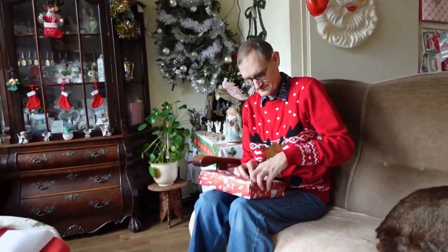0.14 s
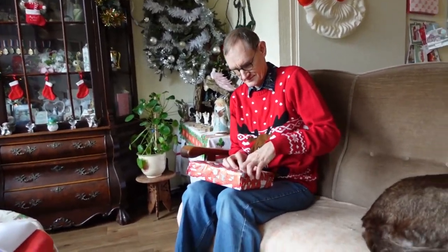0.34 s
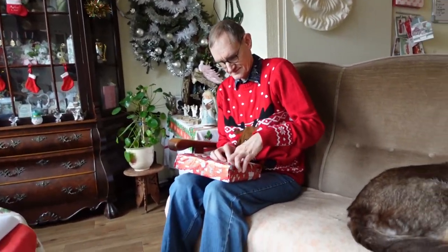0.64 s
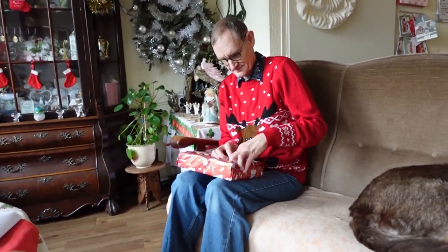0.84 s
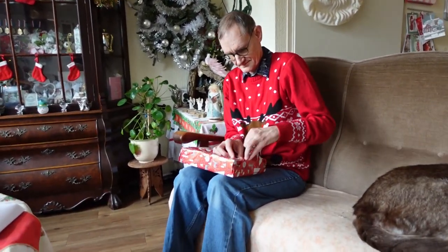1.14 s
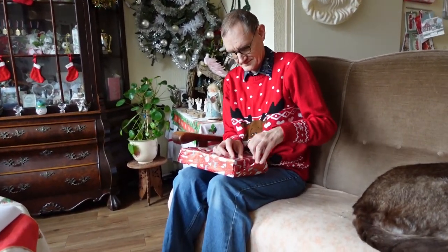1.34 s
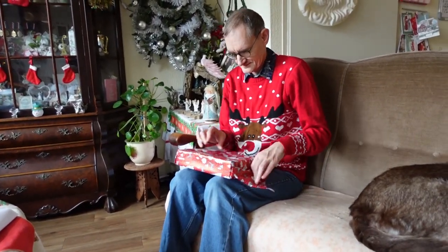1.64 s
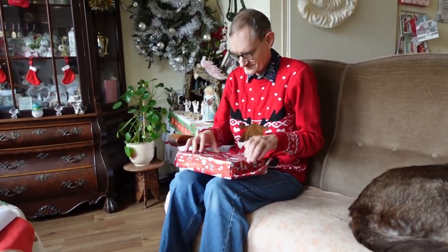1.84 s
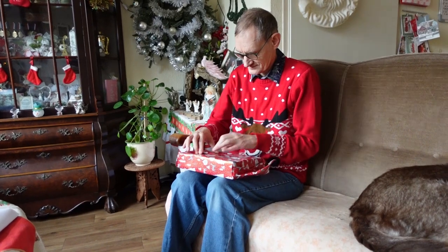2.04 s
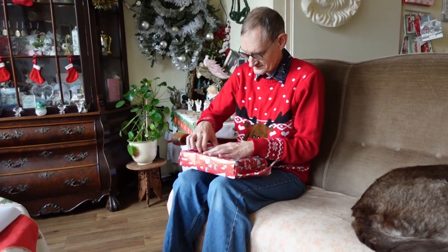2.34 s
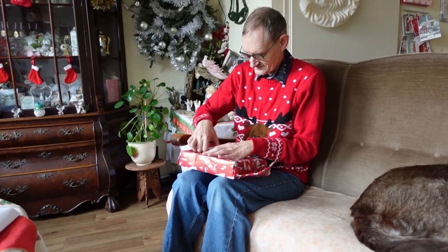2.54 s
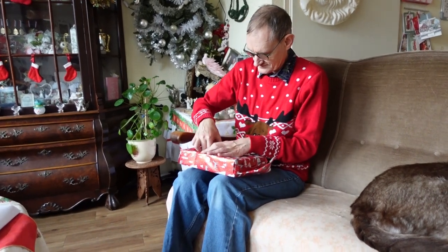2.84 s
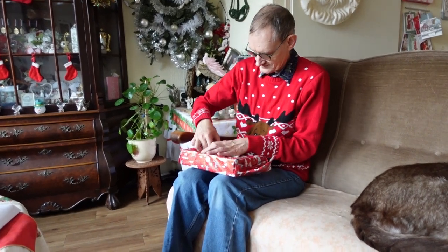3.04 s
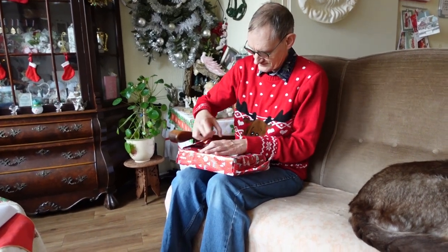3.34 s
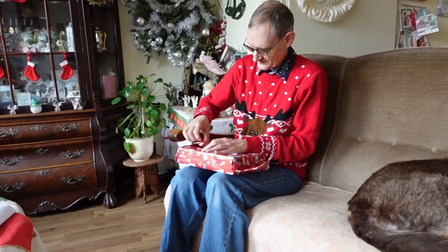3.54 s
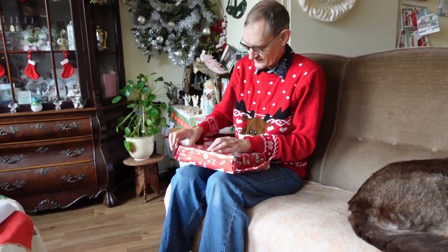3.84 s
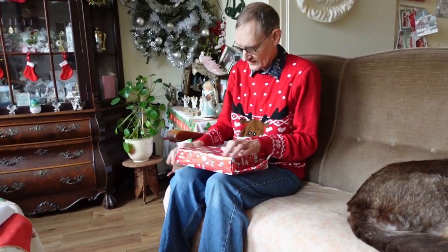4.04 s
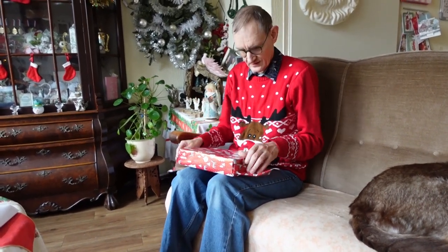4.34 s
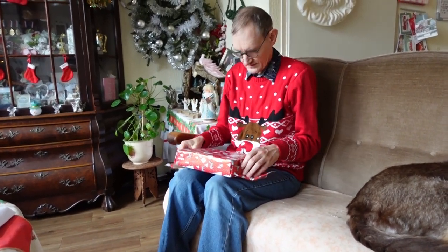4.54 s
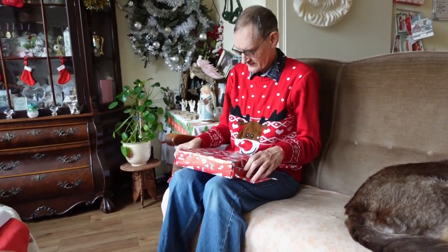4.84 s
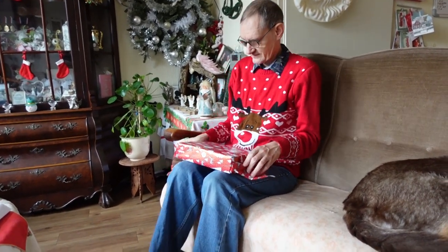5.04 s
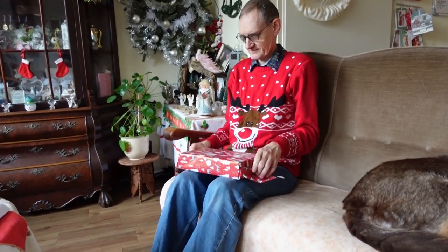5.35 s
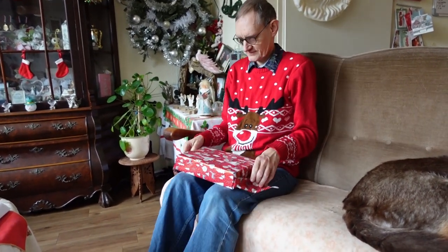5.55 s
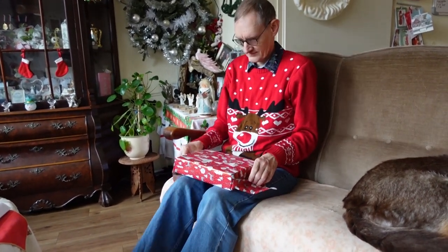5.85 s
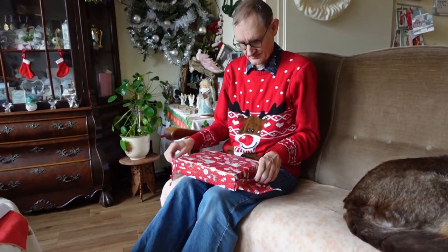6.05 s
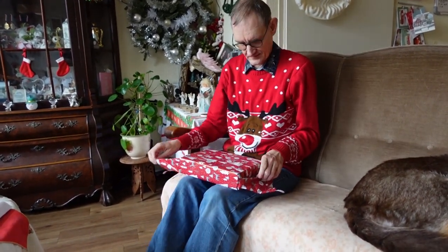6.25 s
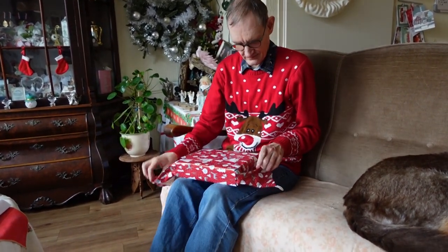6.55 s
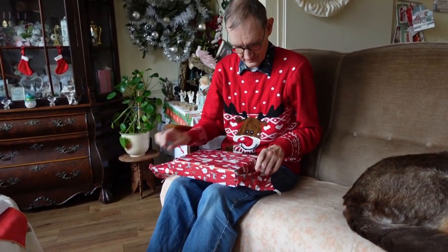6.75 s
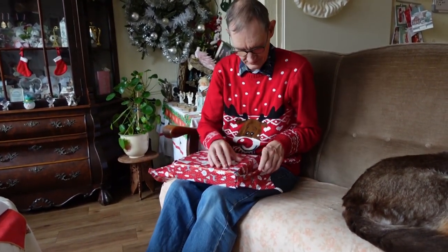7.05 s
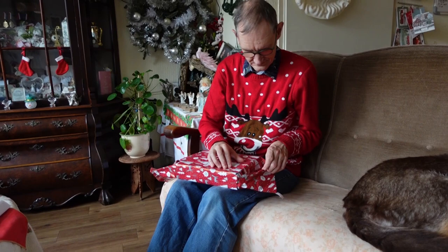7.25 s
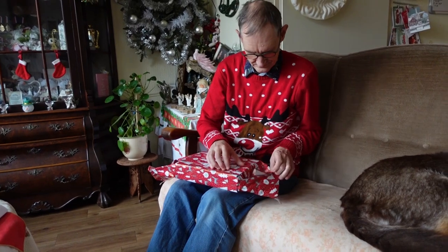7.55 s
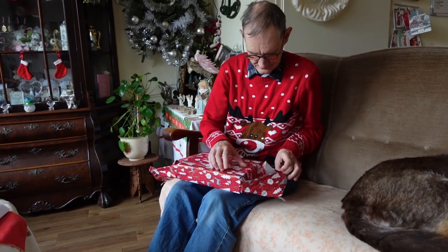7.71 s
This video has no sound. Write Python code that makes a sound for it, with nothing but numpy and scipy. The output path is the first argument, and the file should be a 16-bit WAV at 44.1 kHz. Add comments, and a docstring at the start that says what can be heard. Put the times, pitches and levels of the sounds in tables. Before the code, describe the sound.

Hands work at the paper on a boxed present in a quiet living room. Sharp creases snap over fine rustling crackle, the strongest near three seconds with a dull box knock. A sparse lull follows, then harder crinkling with hollow lid taps, a brief easing, and a dense crackling finish. Stereo microphones a few metres away catch short room reflections, little bass and faint hiss.

```python
"""Hands unwrap a boxed present in a quiet living room; two microphones a few metres off hear little bass.
From the start, snapping creases (shaped noise bursts) stand out of rustling crackle (clumped tiny bursts).
The strongest snap comes near 3 s, among dull box thumps and lid taps (decaying sines), then a lull.
From 5 s the work gets harder, with more thumps and taps; after a brief ease near 7 s it ends in dense snaps.
Echoes and a short random-sign tail answer throughout, over steady coloured noise for air and hiss."""
import sys
import numpy as np
from scipy import signal
from scipy.fft import rfft, irfft, next_fast_len
from scipy.io import wavfile
from scipy.ndimage import uniform_filter1d, minimum_filter1d

SR = 44100
rng = np.random.default_rng(int(sys.argv[2]) if len(sys.argv) > 2 else 0)


def output_pcm(signal):
    """Save a mono or channel-first signal as 16-bit PCM at the path in sys.argv[1].

    Samples are clipped to [-1, 1] before scaling.
    """
    pcm = np.clip(np.atleast_2d(signal).T, -1, 1) * 32767
    wavfile.write(sys.argv[1], SR, np.round(pcm).astype(np.int16))


N = 347508


def amp(db):
    """Converts dB to an amplitude factor."""
    return 10 ** (np.asarray(db) / 20)


def evened(x):
    """Scales to unit rms."""
    return x / np.sqrt(np.mean(x ** 2) + 1e-20)


def read(points, hz):
    """Interpolates a table over log frequency."""
    f, value = np.transpose(points)
    return np.interp(np.log(hz + 1), np.log(f + 1), value)


def coloured(x, points):
    """Filters a long sound by a spectrum in dB."""
    size = next_fast_len(x.shape[-1])
    gain = amp(read(points, np.fft.rfftfreq(size, 1 / SR)))
    return irfft(rfft(x, size) * gain, size)[..., :x.shape[-1]]


# background spectrum: f/Hz, relative level/dB
HUSH_SPECTRUM = [(18, -69), (30, -45), (138, -21), (486, -13), (822, -3), (1460, -6), (1910, 3),
                 (2170, -1.5), (3870, -8.5), (7470, -11), (14000, -21), (16000, -23)]
# mid rms: level/dB
HUSH_LEVEL_DB = -53
# spectrum of the part that differs between the microphones (also in room): f/Hz, gain/dB
SIDE_SPECTRUM = [(60, -2), (150, -4), (380, -2.5), (950, -0.5), (2000, -6.5), (4000, -3.5), (8000, -1),
                 (11000, -5.5), (15000, -44)]


def hush():
    """Still air and microphone hiss: coloured noise, shared part plus sideways part."""
    mid, side = coloured(rng.standard_normal((2, N)), HUSH_SPECTRUM)
    side = coloured(side, SIDE_SPECTRUM)
    return amp(HUSH_LEVEL_DB) * np.array([mid + side, mid - side]) / mid.std()


# reverberation time: f/Hz, t60/s
ROOM_T60 = [(300, 0.55), (800, 0.4), (2000, 0.33), (5500, 0.29), (14000, 0.26)]


def tail():
    """Sparse random-sign taps build up over the first walls; each band decays at its own speed."""
    spacing, build_up_s = 16, 0.0024  # spacing in samples
    taps = np.zeros(SR)
    slots = np.arange(0, SR - spacing, spacing)
    taps[slots + rng.integers(0, spacing, len(slots))] = rng.choice([-1., 1.], len(slots))
    hz, t, bands = signal.stft(taps, SR, nperseg=256)
    bands = bands * amp(-60 * t / read(ROOM_T60, hz)[:, None])
    decayed = signal.istft(bands, SR, nperseg=256)[1][:SR]
    decayed = decayed * (1 - np.exp(-(np.arange(SR) / SR / build_up_s) ** 2))
    return decayed / np.linalg.norm(decayed)


# early echoes off floor, sofa wall and furniture: t/ms, level/dB
EARLY_ECHOES = [(7.2, -16), (13, -17.5), (18, -32), (22, -25.5)]
TAIL_DB, TAIL_SIDE_DB = 0.5, -9.0  # side relative to the tail, before its spectrum


def late_field(thrown):
    """Moving hands excite the room differently with time: three rotating shares, a fresh tail for each."""
    turn = np.pi * np.arange(N) / SR / .37
    late = np.zeros(N)
    for k in range(3):
        share = thrown * np.sqrt(2 / 3) * np.cos(turn + k * np.pi / 3)
        late += signal.fftconvolve(share, tail())[:N]
    return late


def room(direct, walls, thrown):
    """Adds echoes and tail, shared by both microphones but for a weak sideways part."""
    early = np.zeros(SR // 20)
    for ms, db in EARLY_ECHOES:
        early[round(ms * SR / 1000)] = amp(db)
    late = amp(TAIL_DB) * late_field(thrown)
    mid = direct + signal.oaconvolve(walls, early)[:N] + late
    side = amp(TAIL_DB + TAIL_SIDE_DB) * coloured(late_field(thrown), SIDE_SPECTRUM)
    return np.array([mid + side, mid - side])


def struck(events, modes, soft_s):
    """Blows on cardboard, each ringing the same decaying sines after a soft onset."""
    t = np.arange(SR // 4) / SR
    ring = sum(amp(db - 60 * t / t60) * np.sin(2 * np.pi * hz * t) for hz, db, t60 in modes)
    ring = ring * (1 - np.exp(-(t / soft_s) ** 2))
    blows = np.zeros(N)
    for s, db in events:
        blows[round(s * SR)] = amp(db)
    return signal.oaconvolve(blows, ring / abs(ring).max())[:N]


# box knocks against lap and hands: t/s, peak level/dB
BOX_KNOCKS = [(.814, -51), (3.153, -41), (5.317, -55), (5.618, -46), (5.748, -54), (6.388, -43.5)]
# box modes: f/Hz, relative level/dB, t60/s
BOX_MODES = [(163, -14.5, 0.14), (225, -4, 0.08), (272, -8, 0.16), (335, 9.5, 0.04), (459, 3.5, 0.045)]


def thumps():
    """Soft blows ring the low modes of the box."""
    return struck(BOX_KNOCKS, BOX_MODES, soft_s=0.0055)


# fingertips on the lid through the paper: t/s, peak level before the high-pass/dB
LID_TAPS = [(3.016, -32), (3.399, -41), (4.875, -30.5), (4.938, -37), (5.056, -33), (5.146, -29),
            (5.205, -31), (6.233, -24.5), (6.512, -24), (7.663, -30), (7.834, -21.5)]
# lid modes: f/Hz, relative level/dB, t60/s
LID_MODES = [(748, -1, 0.095), (849, 7, 0.027), (977, -18, 0.012), (1810, -4.5, 0.035)]


def lid_taps():
    """Quicker blows ring the hollow lid modes, with the lows cut."""
    high_pass = signal.butter(2, 450, "high", fs=SR, output="sos")
    return signal.sosfilt(high_pass, struck(LID_TAPS, LID_MODES, soft_s=0.0004))


# paper spectrum (also in crackle): f/Hz, relative level/dB
PAPER_SPECTRUM = [(24, -64), (40, -40), (121, -45), (363, -22), (479, -17), (873, -6.5), (1090, -6.5),
                  (1950, 0.5), (2150, -1), (3220, -0.5), (6330, -3), (13400, -15.5), (16000, -25.5)]
LEAD_MS, CREAK_MS, CREAK_DB = 4, 1.1, -9.0  # creak before the crease gives way; its growth; its top


def buckle(ring_hz, treble_db, body_db, burst_ms, ring_db, sharp):
    """One noise burst a crease, coloured by paper and ringing patch.
    Also one clean pulse of equal energy: the colour averaged over all directions."""
    size = 1024
    hz = np.fft.rfftfreq(size, 1 / SR)
    ms = 1000 * np.arange(size) / SR - LEAD_MS
    creak = amp(CREAK_DB) * np.exp(ms / CREAK_MS)
    shape = np.where(ms < 0, creak, np.exp(-(ms / burst_ms) ** 2))
    slips = rng.standard_normal((len(ring_hz), size)) * shape

    patch_db = ring_db / (1 + (sharp * np.log((hz + 1) / ring_hz[:, None])) ** 2)
    treble_shelf_db = treble_db[:, None] / (1 + (6000 / (hz + 1)) ** 4)
    body_shelf_db = body_db[:, None] / (1 + (hz / 1200) ** 4)
    colour_db = read(PAPER_SPECTRUM, hz) + patch_db + treble_shelf_db + body_shelf_db

    # minimum phase: the colour adds no sound before the slip
    log_gain = np.log(amp(colour_db))
    circle = np.concatenate([log_gain, log_gain[:, -2:0:-1]], axis=1)
    causal = np.exp(np.conj(signal.hilbert(circle))[:, :len(hz)])
    burst = irfft(rfft(slips) * causal, size)
    burst = burst / abs(burst).max(axis=1, keepdims=True)
    pulse = np.roll(irfft(causal, size), round(LEAD_MS * SR / 1000), axis=1)
    return burst, pulse * (burst.std(axis=1) / pulse.std(axis=1))[:, None]


# how hard the hands work the sheet: t/s, crackle level/dB
HAND_EFFORT = [(0, -44), (.25, -46), (.6, -41), (1, -44), (1.3, -44.5), (1.45, -48.5), (1.7, -51.5),
               (2.15, -59), (2.3, -45.5), (3, -61), (3.35, -104), (3.88, -50), (3.95, -44), (4.06, -45.5),
               (4.27, -45), (4.33, -55.5), (4.7, -51), (4.85, -37.5), (5.03, -49), (5.2, -34.5),
               (5.5, -40.5), (5.78, -32), (5.85, -40.5), (6.15, -30), (6.3, -33), (6.39, -21.5),
               (6.55, -30.5), (6.82, -45), (6.9, -50), (7.03, -48), (7.16, -37.5), (7.42, -43),
               (7.47, -30.5), (7.68, -30.5), (7.88, -20)]
# each snap starts a shower of small creases, its level following that of the snap
SHOWER_DB, SHOWER_DB_PER_DB, SHOWER_RISE_S, SHOWER_T60_S = -26, 0.87, 0.002, 0.38
SHOWER_TREBLE_DB, SHOWER_TREBLE_INHERITED, SHOWER_BODY_DB = 0.5, 0.78, -2.5
RUB_TREBLE_DB = -2.5  # loose rubbing is dull


def effort():
    """Power of rubbing and of decaying showers, and the power-weighted shower treble."""
    s, db, _, treble_db, thrown_db = np.transpose(CREASE_SNAPS)
    t = np.arange(N) / SR
    power = amp(SHOWER_DB + SHOWER_DB_PER_DB * (db + thrown_db)) ** 2
    shower_treble_db = SHOWER_TREBLE_DB + SHOWER_TREBLE_INHERITED * treble_db
    starts = np.zeros((2, N))
    starts[:, np.round(s * SR).astype(int)] = power, power * shower_treble_db
    rise = 1 - np.exp(-t[:SR] / SHOWER_RISE_S)
    shower = (rise * amp(-60 * t[:SR] / SHOWER_T60_S)) ** 2
    showered, weighted_treble = signal.oaconvolve(starts, [shower], axes=1)[:, :N]
    rubbed = amp(np.interp(t, *np.transpose(HAND_EFFORT))) ** 2
    return rubbed, abs(showered), weighted_treble


CRACKLE_THROWN_DB = -2.5  # share that reaches the walls


def crackle(per_s=900, slide_db=-9, body_db=3):
    """Small creases in clumps over sliding hiss, as straight, near-wall and room sound."""
    rubbed, showered, weighted_treble = effort()
    power = rubbed + showered
    treble_db = (RUB_TREBLE_DB * rubbed + weighted_treble) / power
    low_db = SHOWER_BODY_DB * showered / power

    count = 24  # different paper patches
    flat, ring_hz = np.zeros(count), np.geomspace(900, 7500, count)
    grains = np.array(buckle(ring_hz, flat, flat + body_db, burst_ms=0.63, ring_db=10, sharp=4.3))
    drift = uniform_filter1d(uniform_filter1d(rng.standard_normal(N), 300), 300)
    clumps_db = 3.5 * evened(drift)
    size_db = 4.5 * np.minimum(rng.exponential(1, N), 3.2)
    hits = (rng.random(N) < per_s / SR) * amp(size_db + clumps_db)
    patch = rng.integers(0, count, N)
    small = np.zeros((2, N))  # bursts, pulses
    for k in range(count):
        small += signal.oaconvolve([hits * (patch == k)], grains[:, k], axes=1)[:, :N]
    slide = evened(coloured(rng.standard_normal(N), PAPER_SPECTRUM))
    sheet = evened(small) + amp(slide_db) * slide

    low = signal.sosfiltfilt(signal.butter(2, 1200, fs=SR, output="sos"), sheet)
    top = signal.sosfiltfilt(signal.butter(2, 6000, "high", fs=SR, output="sos"), sheet)
    sheet = sheet + (amp(treble_db) - 1) * top + (amp(low_db) - 1) * low
    direct, thrown = np.sqrt(power) * sheet
    return np.array([direct, amp(CRACKLE_THROWN_DB) * direct, amp(CRACKLE_THROWN_DB) * thrown])


# buckling creases, plus at 1.1382 s a quick echo of the snap just before (also in effort): t/s, burst peak
# level/dB, patch ring f/Hz, treble level/dB, share thrown into the room/dB
CREASE_SNAPS = [(0.1101, -16.5, 1880, 3, 1), (.1796, -20.5, 1920, 5, 2), (0.2695, -22.5, 1850, 4, 5),
                (0.2933, -13.5, 4540, -5.5, 5), (0.3189, -13, 7700, 1.5, 5), (0.45, -22, 3020, 7, 11.5),
                (.46, -11, 7700, 7, -0.5), (0.546, -22, 1940, 16.5, 5), (0.5923, -24, 3830, 4, 0),
                (0.6237, -18, 7750, -2, -2), (0.6624, -8, 1200, 3.5, 1), (.7234, -12, 5200, 3, 2),
                (0.8161, -0.5, 2060, -1, -3), (0.8237, 2, 3940, 8, -2.5), (1.0408, -16.5, 3020, 7, -5),
                (1.11, -16, 3660, 10, -6.5), (1.1318, -0.5, 3950, 4, 5.5), (1.1382, -1, 5600, 2, -20),
                (1.2817, -20.5, 1770, -17, -3), (1.3671, -19, 2900, -42, -1.5),
                (1.3888, -32.5, 4180, 14, -27.5), (1.5421, -17.5, 3500, -2.5, -0.5),
                (1.5762, -16.5, 5500, -3, 0), (1.6143, -14, 2570, -6.5, -7), (1.6349, -15.5, 3030, -6, 0.5),
                (1.6761, -10.5, 3970, 5, -4.5), (1.8128, -25, 5900, 3, -5), (1.878, -27.5, 3420, -6, 4.5),
                (1.8977, -17.5, 6540, -3, -7), (2.017, -36, 2000, 7, 5.5), (2.2384, -16.5, 7300, -9, -4),
                (2.289, -21, 3420, 8, -3), (2.5021, -14.5, 5300, 0, -5), (2.5314, -16, 4660, 9, 5.5),
                (2.656, -20.5, 2860, 0.5, 4), (2.7655, -17, 3900, 3.5, 4.5), (2.8044, -16, 5850, 9, -2),
                (2.8573, -18, 4370, 1, 2), (2.8944, -19.5, 3370, -11, -1), (2.922, -18, 4910, 24, -3),
                (2.932, -13.5, 1930, -4, -5), (3.013, -16, 2250, -53, -3), (3.0496, -18.5, 3010, -6, 3),
                (3.0652, 8, 3420, 3.5, -2), (3.072, -10, 11200, 20, -3), (3.126, -5.5, 7060, 28, -5.5),
                (3.1565, -0.5, 1980, 0, -0.5), (3.4003, -21.5, 1690, -78, -5), (3.453, -20, 2910, -22, -2),
                (3.5503, -33, 2950, -27, -5), (3.6142, -33.5, 1820, -6, 5.5), (3.6304, -28, 2280, 4, -4.5),
                (3.7367, -25.5, 4520, 4, -2.5), (4.015, -23, 3220, 5, 3.5), (4.058, -21.5, 4100, 2, 8.5),
                (4.168, -17.5, 3450, 2, -0.5), (4.21, -27.5, 7550, 20, 5), (4.4276, -27.5, 6160, -0.5, 6),
                (4.4997, -25, 5600, 3, -5), (4.5263, -16.5, 2930, 3, -4.5), (4.6129, -22, 2300, -6, -8),
                (4.7726, -22.5, 3330, -5, 2.5), (4.8366, -22.5, 3190, -4, -18), (4.873, -16, 2980, 10, 1),
                (4.94, -22, 1660, 4, 3.5), (4.9776, -22, 3790, -4, -4), (5.056, -24, 4500, 2, 2),
                (5.0661, -13.5, 3930, 7, -4.5), (5.1531, -20, 1820, 5, 7.5), (5.1665, -9, 4100, -7, 0.5),
                (5.287, -29, 6370, 1, 13), (5.3993, -11, 4830, 0, -1.5), (5.418, -19.5, 2800, 2, 6.5),
                (5.553, -22.5, 2950, 7, 8.5), (5.6278, -15, 4100, -2, -7), (5.6629, -7, 2700, -1, -5),
                (5.7001, -16, 3300, 9, -9), (5.8406, -15, 7100, 6, 2.5), (5.864, -17, 3500, -14, -3),
                (5.8993, -17.5, 3250, 6, 3.5), (5.9686, -8, 4100, -3, -3), (5.986, -16.5, 4780, 6, -1),
                (6.0484, -9, 1430, -1, -1.5), (6.1315, -17, 4000, 11, 11), (6.1483, -5, 6030, 5, 2),
                (6.1661, -3, 1930, 2, -24), (6.228, -10, 3980, 9, 4), (6.3524, -11, 3120, 4.5, 8),
                (6.421, -15, 1610, 4, -1), (6.4645, -7, 1730, 2, 5.5), (6.5134, -7, 1930, 1, -12),
                (6.573, -8, 5840, 9, -5.5), (6.6163, -15, 6850, 19, -10), (6.654, -15.5, 3400, -11, -12),
                (6.7434, -21, 2150, 3, 1.5), (6.8687, -21.5, 3900, 4, 1.5), (6.883, -21, 5900, -8, -3.5),
                (6.903, -19.5, 3110, -12, 2), (7.056, -36, 2470, -8, 13.5), (7.0844, -31.5, 3100, -21, 12),
                (7.232, -20, 2370, -25, 1), (7.254, -13, 4520, -6, 0.5), (7.2616, -9, 2060, -10, -4),
                (7.277, -11.5, 4000, 3, -4), (7.295, -11.5, 3020, -2, -6), (7.3637, -12.5, 3070, -7, -6),
                (7.443, -14.5, 4450, -2, 8.5), (7.4495, -4.5, 3060, -6, -4.5),
                (7.5058, -8.5, 1690, -5, -0.5), (7.5226, -12.5, 8000, 2, -0.5),
                (7.5607, -5.5, 4300, 14.5, -2.5), (7.595, -8.5, 4420, 2, 0), (7.6317, -8, 4880, 10, 1.5),
                (7.641, 6, 3080, -2, -15.5), (7.7096, -2.5, 2580, -5, 1), (7.7372, -3, 3030, -10, -20),
                (7.7979, -6.5, 1670, -21, -12), (7.8136, -3.5, 6670, 8, 0.5), (7.8357, -1.5, 3150, -24, -2),
                (7.848, -3, 2920, 6.5, -10), (7.867, -6.5, 3600, -4, 5)]
BODY_AT_3KHZ_DB, BODY_DB_PER_OCTAVE = -5, -4  # large, low patches have more body


def snaps():
    """Creases that stand out, as straight, near-wall and room sound."""
    s, db, ring_hz, treble_db, thrown_db = np.transpose(CREASE_SNAPS)
    body_db = BODY_AT_3KHZ_DB + BODY_DB_PER_OCTAVE * np.log2(ring_hz / 3000)
    burst_ms = 1.375 * amp(0.18 * thrown_db)[:, None]  # long creases tear longer and fill the room more
    burst, pulse = buckle(ring_hz, treble_db, body_db, burst_ms, ring_db=8, sharp=5.1)
    start = np.round((s - LEAD_MS / 1000) * SR).astype(int)
    at = start[:, None] + np.arange(burst.shape[1])
    out = np.zeros((3, N + burst.shape[1]))
    np.add.at(out[0], at, amp(db)[:, None] * burst)
    np.add.at(out[1], at, amp(db + .5 * thrown_db)[:, None] * burst)
    np.add.at(out[2], at, amp(db + thrown_db)[:, None] * pulse)
    return out[:, :N]


def scene():
    """Sends all paper and box sounds through the room, tilts left by 0.3 dB, adds the hush."""
    box = thumps() + lid_taps()  # equal in all three paths
    direct, walls, thrown = snaps() + crackle() + box
    balance_db = np.array([[.15], [-.15]])
    return room(direct, walls, thrown) * amp(balance_db) + hush()


def record(dry):
    """A quick limiter holds peaks to 0.97 of full scale; then a low-pass sets the band limit."""
    headroom = np.minimum(1, .97 / (abs(dry).max(axis=0) + 1e-9))
    gain = uniform_filter1d(minimum_filter1d(headroom, size=181), size=91)
    low_pass = signal.firwin(511, 15900, window=("kaiser", 9), fs=SR)
    return signal.oaconvolve(dry * gain, low_pass[None], "same")


dry = scene()
out = record(dry)
output_pcm(out)
```